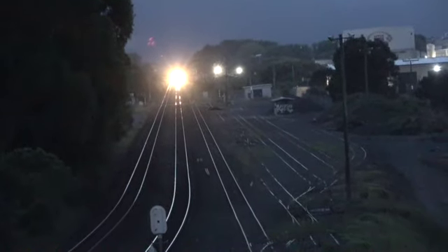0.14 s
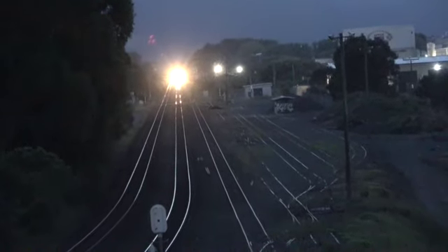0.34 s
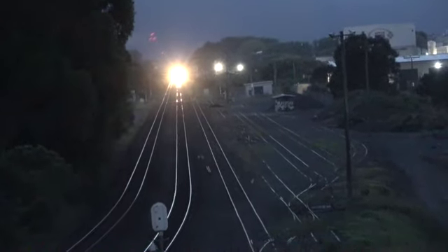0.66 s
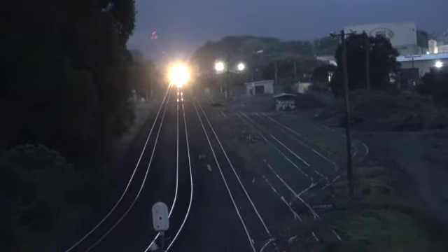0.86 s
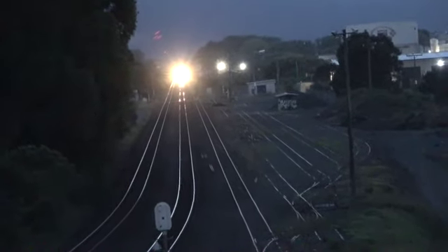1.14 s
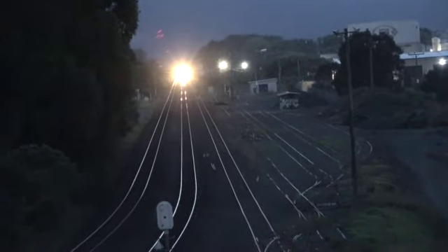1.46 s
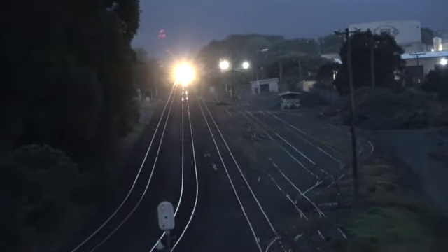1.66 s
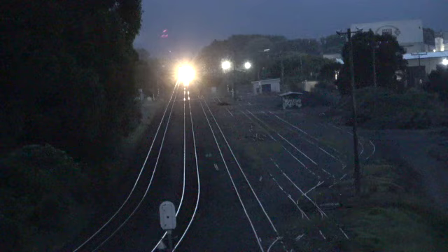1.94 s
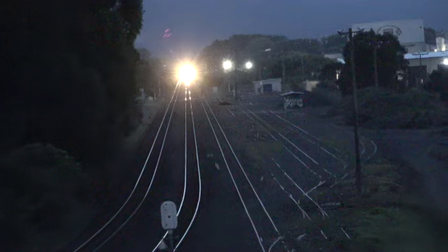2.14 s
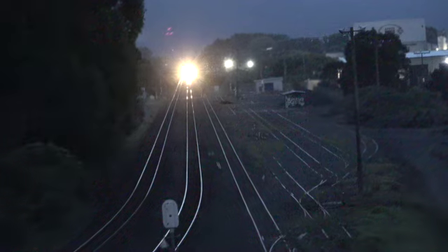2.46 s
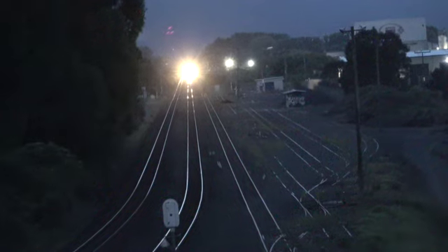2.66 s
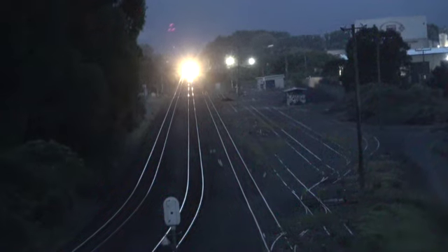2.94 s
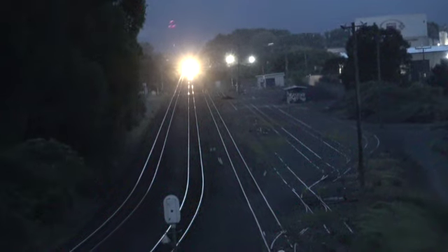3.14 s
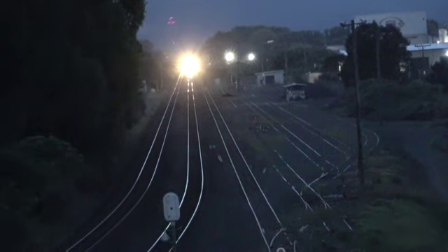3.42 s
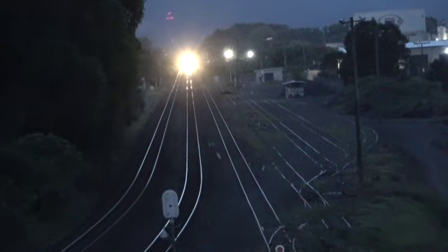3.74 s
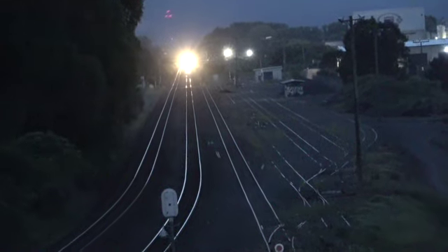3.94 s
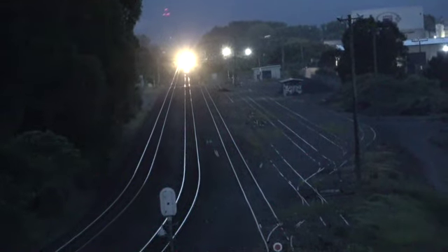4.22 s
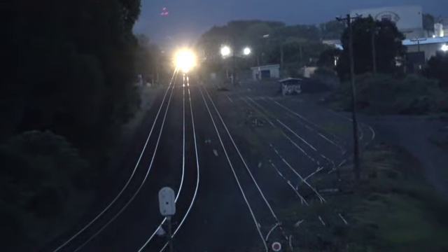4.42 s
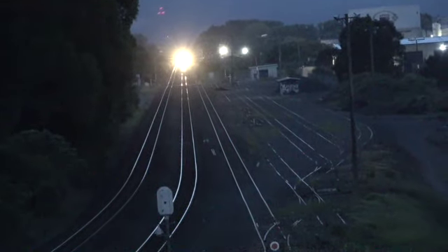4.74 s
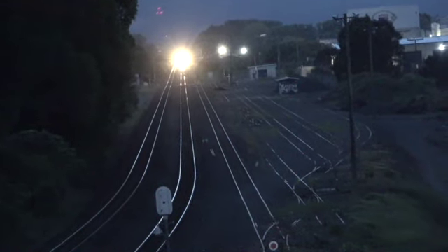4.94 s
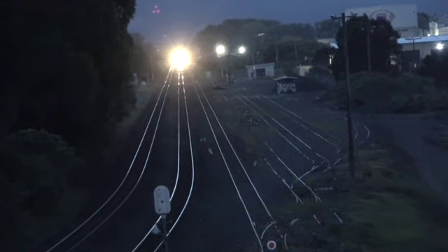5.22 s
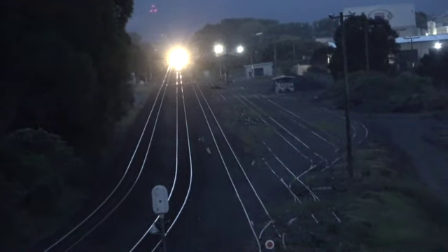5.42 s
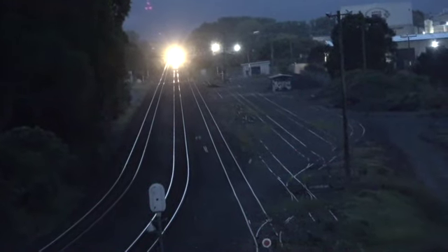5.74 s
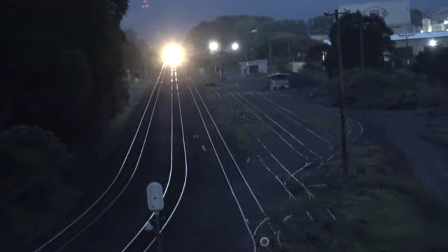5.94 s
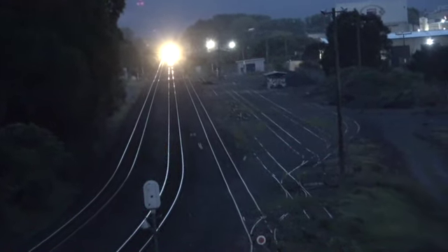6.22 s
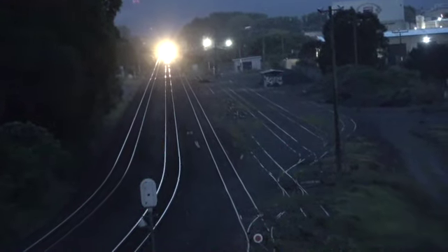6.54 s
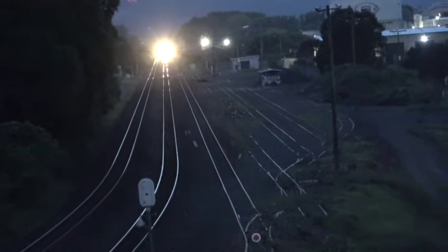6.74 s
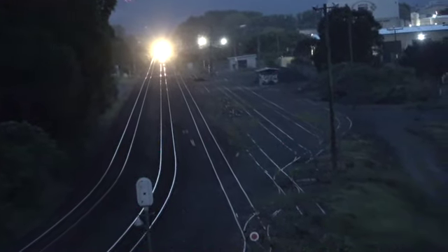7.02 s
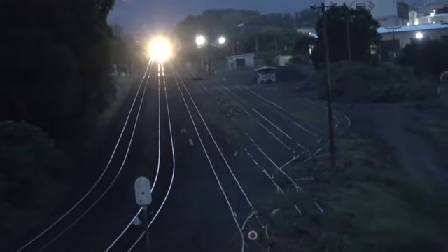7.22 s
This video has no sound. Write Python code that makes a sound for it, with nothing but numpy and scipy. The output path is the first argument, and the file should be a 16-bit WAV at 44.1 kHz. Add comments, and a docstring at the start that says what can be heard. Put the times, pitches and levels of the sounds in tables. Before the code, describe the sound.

Diesel locomotives drone and wind up slowly in the distance at dusk while crickets chirp and trill nearby; engines fade before small close clicks.

```python
"""Dusk beside a railway line: crickets, made of pitch-falling wing strokes, chirp and trill in the grass throughout,
over soft hiss, noise-made wheel roar and drone. One diesel engine hunts, then winds up; from 1.6 s a second one
winds up at its own speed. Their harmonics swell and fade on the way over the ground.
Filtered noise adds a rumble that grows from about 2 s. Rustles and scuffs of grainy noise brush close by;
in the last second the engines die away and small clicks snap and ring near the microphone."""
import sys
import numpy as np
from scipy import signal
from scipy.fft import rfft, irfft, next_fast_len
from scipy.io import wavfile
from scipy.ndimage import uniform_filter1d

SR = 44100
rng = np.random.default_rng(int(sys.argv[2]) if len(sys.argv) > 2 else 0)


def wav_record(signal):
    """Record a signal, one row per channel, as 16-bit PCM in the file named by sys.argv[1]."""
    frames = np.transpose(np.atleast_2d(signal))
    bounded = np.clip(frames, -1, 1)
    # unit amplitude maps onto the largest positive 16-bit level
    quanta = np.round(bounded * 32767).astype(np.int16)
    wavfile.write(sys.argv[1], SR, quanta)


N = 325149
TIME = np.arange(N) / SR


def undb(db):
    """Decibels to gain."""
    return 10 ** (np.asarray(db) / 20)


def unit(x):
    """Scale to rms 1."""
    return x / np.sqrt(np.mean(x ** 2))


def curves(table):
    """The columns of a timed table, sample by sample."""
    s, *columns = np.transpose(table)
    return [np.interp(TIME, s, column) for column in columns]


def colour(x, points):
    """Filter by a spectrum of (frequency [Hz], gain [dB]) points, joined on a log frequency scale."""
    hz, db = np.transpose(points)
    size = next_fast_len(N)
    f = np.maximum(np.arange(size // 2 + 1) * SR / size, 1)
    gain = undb(np.interp(np.log(f), np.log(hz), db))
    return irfft(rfft(x, size) * gain, size)[..., :N]


def noise(points):
    """Noise of rms 1 with the given spectrum."""
    return unit(colour(rng.standard_normal(N), points))


def wide_noise(points):
    """Two-channel noise, nearly alike on both sides except in the treble."""
    # side signal against the middle: (frequency [Hz], level [dB])
    width = [(4600, -29), (5400, -2.5), (9000, -1), (12500, -2), (15000, -11)]
    middle = noise(points)
    side = colour(noise(points), width)
    return middle + np.array([[1], [-1]]) * side


def walk(rate):
    """Smooth random wander of spread near 1, with about `rate` new steps a second."""
    k = max(int(SR / rate), 1)
    steps = rng.standard_normal(2048)[np.arange(N) // k % 2048]
    return 1.3 * uniform_filter1d(uniform_filter1d(steps, k), k)


def swells(table):
    """An envelope of bells (centre [s], peak [dB], length [s]), each 17 dB down one length from its centre."""
    return sum(undb(db) * np.exp(-2 * ((TIME - s) / length) ** 2) for s, db, length in table)


def pan(x, db):
    """Place a sound by its left minus right level, steady or moving."""
    return x * undb(np.array([[1], [-1]]) * db / 2)


def add(track, s, sound):
    """Mix a short sound into a track from time s."""
    i = int(s * SR)
    part = sound[max(-i, 0):max(N - i, 0)]
    track[max(i, 0):max(i, 0) + len(part)] += part


def scatter(x, t60, wet_db, channels):
    """Add a diffuse echo, as from trees and banks, of decaying noise: one for both sides, or one for each."""
    t = TIME[:SR // 2]
    tail = rng.standard_normal((channels, len(t))) * np.exp(-np.log(1000) * t / t60)
    tail /= np.sqrt(np.sum(tail ** 2, axis=1, keepdims=True))
    return x + undb(wet_db) * signal.fftconvolve(x, tail, axes=1)[:, :N]


def syllable(hz, length, sweep):
    """One wing stroke: the scraper slows along the file, so the tone falls ever faster."""
    u = np.arange(int(length * SR)) / (length * SR)
    pitch = hz * (1 + sweep * (1 / 3 - u * (1 + 2 * u) / 3))
    return np.sin(np.pi * u) * np.sin(2 * np.pi * np.cumsum(pitch) / SR)


def trill(start, end, hz, rate, length, sweep):
    """A run of slightly uneven wing strokes that fades in and out."""
    fade_s = .05  # the fades reach this far to either side of the start and the end
    voice = np.zeros(N)
    times = np.arange(start - fade_s, end + fade_s, 1 / rate)
    for s, (late, detune, size) in zip(times, rng.standard_normal((512, 3))):
        fade = np.sqrt(np.clip(.5 + .5 * min(s - start, end - s) / fade_s, 0, 1))
        stroke = syllable(hz * (1 + 0.0097 * detune), length, sweep)
        add(voice, s + .07 * late / rate, fade * stroke * undb(0.88 * size))
    return voice


def air():
    """Soft steady hiss: filtered noise, spread wide in the treble."""
    # spectrum of the hiss: (frequency [Hz], relative level [dB])
    air_colour = [(1000, 9), (4800, 4), (6200, 8.5), (8500, 3), (12500, 1), (16000, -4)]
    return wide_noise(air_colour) * undb(-66.5)


def shrill_insects():
    """Smaller insects to the right, with fast high wing strokes: one trills in bouts, a few faint ones never stop."""
    # bouts of the nearer insect: (start [s], end [s], pitch [Hz], relative level [dB])
    bout_table = [(0, .34, 6950, -63.5), (0.338, .88, 7200, -69), (1.28, 2.16, 7060, -68.5),
                  (2.162, 2.58, 6900, -64), (3.146, 4.1, 7070, -69), (4.453, 5.5, 7060, -65.5),
                  (5.498, 6.1, 7210, -69), (6.601, 7.37, 7060, -63.5)]
    bouts = sum(trill(start, end, hz, rate=61.4, length=.018, sweep=0.074) * undb(db + 3)
                for start, end, hz, db in bout_table)
    voices = [(6180, 38), (6500, 27), (7300, 60)]  # (pitch [Hz], rate [strokes/s])
    faint = sum(trill(0, N / SR, hz, rate, length=0.017, sweep=0.09) * undb(-70.0 + 1.6 * walk(3.0))
                for hz, rate in voices)
    left, right = pan(bouts * undb(1.3 * walk(9)), -4) + pan(faint, -1.5)
    left = np.roll(left, 1)  # reaches the left a moment later
    return scatter(np.array([left, right]), t60=0.14, wet_db=-3, channels=2)


def far_crickets():
    """A chorus of steady trills further off, blurred by the undergrowth into a diffuse tail."""
    # swell of the chorus: (time [s], relative level [dB])
    chorus_curve = [(0, -60), (1.3, -55.5), (2, -56), (2.6, -58.5), (3.25, -60.5), (4.3, -54), (5.5, -60.5),
                    (6.4, -56.5), (7.37, -58.5)]
    chorus_db, = curves(chorus_curve)
    # (pitch [Hz], rate [strokes/s])
    voices = [(3680, 27), (3740, 30), (3790, 32), (3840, 17.5), (3880, 27), (3930, 34)]
    chorus = unit(sum(trill(0, N / SR, hz, rate, length=0.02525, sweep=.14) * undb(1.96 * walk(2.93))
                      for hz, rate in voices))
    return scatter(pan(chorus * undb(chorus_db - .5), 4.5), t60=.2, wet_db=-15, channels=1)


def near_crickets():
    """Two crickets scrape phrases of slow chirps and quick trills, no two strokes quite alike."""
    # (first stroke [s], last stroke [s], relative level [dB], cricket, song)
    phrases = [ (0.011, 0.067, -5, "low", "chirp"), (0.197, 0.743, -5, "low", "trill"),
               (.722, 0.937, -5.5, "high", "chirp"), (0.98, 1.023, -7, "high", "trill"),
               (1.233, 1.336, -4, "low", "trill"), (1.551, 1.786, -1, "low", "chirp"),
               (1.844, 2.234, -3, "low", "trill"), (2.279, 2.981, -12.5, "low", "trill"),
               (3.017, 3.119, -5, "low", "trill"), (3.423, 3.659, -4.5, "low", "chirp"),
               (3.712, 3.777, -3.5, "low", "trill"), (3.525, 3.903, -7.5, "high", "chirp"),
               (4.072, 4.45, -10, "high", "trill"), (4.62, 4.855, -10, "high", "trill"),
               (4.965, 5.291, -10.5, "low", "trill"), (5.546, 5.825, -6.5, "high", "chirp"),
               (5.863, 6.07, -7.5, "high", "trill"), (6.233, 6.462, -6.5, "high", "trill"),
               (6.575, 6.77, -2.5, "low", "chirp"), (6.85, 7.322, -10.5, "low", "trill")]
    # each cricket: (pitch [Hz], left minus right [dB])
    singers = {"low": (3775, 7.3), "high": (4030, 4.4)}
    # each song: (rate [strokes/s], stroke length [s], fall of pitch in a stroke [share])
    songs = {"chirp": (17.3, .032, 0.177), "trill": (30.4, .028, 0.138)}
    # spread from stroke to stroke: (length [share], level [dB], pitch [share], fall [share])
    uneven = (.08, 1.5, .006, .14)
    out = np.zeros((2, N))
    for first, last, db, cricket, song in phrases:
        hz, pan_db = singers[cricket]
        rate, stroke_s, sweep = songs[song]
        voice = np.zeros(N)
        times = np.linspace(first, last, round((last - first) * rate) + 1)
        variations = rng.standard_normal(size=(40, 4)) * uneven
        for s, (stretch, force_db, detune, bend) in zip(times, variations):
            length = stroke_s * (1 + stretch)
            stroke = syllable(hz * (1 + detune), length, sweep * (1 + bend))
            add(voice, s - length / 2, undb(db + force_db) * stroke)
        out += pan(voice, pan_db)
    # the wings resonate only up to a little over 4 kHz
    resonance = [(3000, -6.5), (3450, 2), (4150, -1.5), (4400, -11)]
    return colour(out, resonance) * undb(-42.5)


def whistle():
    """One faint, falling tone of wavering level, perhaps a bird."""
    out = np.zeros(N)
    add(out, 3.64, syllable(2950, length=.2, sweep=.14))
    return pan(out * undb(-60.5 + 3.8 * walk(40)), -2.6)


def brush(table, points, grain_db):
    """Friction: short swells of noise whose level flickers in fine grains."""
    grain = unit(undb(grain_db * walk(900)))
    return swells(table) * grain * wide_noise(points)


def rustles():
    """Thin rustles in the grass: grainy friction noise, all treble."""
    # (centre [s], peak level [dB], length [s])
    rustle_table = [(.455, -62, 0.024), (.99, -59, 0.025), (1.84, -67, 0.021), (3.425, -59.5, 0.015),
                    (3.54, -67, 0.013), (4.03, -68, 0.019), (6.17, -67, 0.014), (6.27, -65, .02),
                    (6.41, -57, 0.021), (6.83, -68, 0.036)]
    spectrum = [(5000, -33), (8000, -10), (9500, -1), (11500, 1), (13500, -10), (16000, -18)]
    return pan(brush(rustle_table, spectrum, grain_db=3), -1)


def scuffs():
    """Dry scuffs to the right: coarser friction noise, strongest in the middle range."""
    # (centre [s], peak level [dB], length [s])
    scuff_table = [(.15, -63, 0.039), (.745, -56, 0.039), (.997, -54, 0.023), (6.5, -41.5, 0.032),
                   (6.56, -47.5, 0.034), (6.655, -52.5, 0.018), (6.745, -52, 0.016)]
    spectrum = [(150, -10), (650, 27.5), (1500, 8), (2800, 9), (5000, 6), (7000, 6.5), (12000, -0.5),
                (16000, -10)]
    return pan(brush(scuff_table, spectrum, grain_db=5.5), -8.5)


def clicks():
    """Each click is a tiny noise snap and a quickly damped ring of two modes."""
    # (time [s], relative level [dB], ring [Hz], snap against the ring [dB], left minus right [dB])
    click_table = [(6.489, -31, 860, -3, -10), (6.507, -29, 7050, -5, -10), (6.541, -45, 2370, 5, -4),
                   (6.555, -37, 6000, -7, -12), (7.183, -20.5, 1030, -30, -7),
                   (7.2253, -23.5, 2660, 0.5, -6), (7.281, -19.5, 933, -5, -4)]
    # what a click rings with: (multiple of its ring frequency, level [dB])
    modes = [(1, -5.5), (2.08, -18.5)]
    ring_s, snap_s = 0.0014, 0.00038  # ring falls to 1/e in this time; snap peaks at this time
    snap_colour = [(300, 4), (1800, 1), (4500, -0.5), (8000, -9.5), (12000, -7.5), (15500, -22)]
    out, t = np.zeros((2, N)), TIME[:SR // 50]
    for s, db, hz, snap_db, pan_db in click_table:
        ring, snap = np.zeros(N), np.zeros(N)
        tone = sum(undb(mode_db) * np.sin(2 * np.pi * k * hz * t) for k, mode_db in modes)
        burst = rng.standard_normal(len(t)) * t / snap_s * np.exp(1 - t / snap_s)
        add(ring, s, tone * np.exp(-t / ring_s))
        add(snap, s, undb(snap_db) * burst)
        out += pan(undb(db) * (ring + colour(snap, snap_colour)), pan_db)
    return scatter(out, t60=.02, wet_db=-12, channels=2)


def wheels():
    """Rolling wheels: a broad roar of filtered noise, a little louder midway."""
    # spectrum: (frequency [Hz], relative level [dB])
    wheel_colour = [(40, -45), (200, 3), (450, 1.5), (620, 5), (760, 0.5), (1020, 3.5), (1200, -3),
                    (1580, -4), (1900, -10), (2350, -14.5), (2700, -17), (3200, -18.5), (5000, -35)]
    level = undb(-50.5 + .5 * walk(10.0)) + swells([(3.46, -62, 3.9)])
    return noise(wheel_colour) * level


def singing_wheels():
    """The wheels ring for a moment: a narrow band of noise near 1 kHz."""
    spectrum = [(700, -6), (920, 0), (1030, 10), (1130, -8), (1400, -51)]
    return noise(spectrum) * swells([(3.15, -49.5, 0.51)])


def low_roar():
    """Soft unsteady swells of noise centred near 310 Hz."""
    # (centre [s], relative peak level [dB], length [s])
    roar_swells = [(.4, -41, 0.2), (1.3, -45.5, 0.19), (7.15, -51.5, 0.14)]
    spectrum = [(100, -25), (200, -30), (310, 4.5), (480, -5.5), (620, -12.5), (1000, -19.0), (2000, -53.0)]
    return noise(spectrum) * swells(roar_swells) * undb(2 * walk(16))


def drone():
    """Droning bodywork: a low-mid band of noise with a wandering level."""
    # spectrum: (frequency [Hz], relative level [dB])
    drone_colour = [(30, -62), (60, -26.5), (100, -3.5), (160, 4.5), (220, 5), (330, 2), (420, -2.5),
                    (560, -14.5), (900, -51)]
    # (time [s], level before the wander [dB])
    drone_curve = [(0, -44.5), (.6, -43.5), (1.7, -47.5), (2.6, -42.5), (4.1, -42.5), (4.8, -46.5),
                   (6.5, -43.5), (7.37, -43.5)]
    drone_db, = curves(drone_curve)
    return noise(drone_colour) * undb(drone_db + 1.6 * walk(9))


def rumble():
    """Turbulent exhaust rumble: bass noise that comes on with the throttle and dies as it closes."""
    # spectrum: (frequency [Hz], relative level [dB])
    rumble_colour = [(12, -5), (26, -6), (45, 0.5), (70, -1), (110, 2), (180, -2), (300, -16), (600, -72.5)]
    # (time [s], relative level [dB])
    rumble_curve = [(0.0, -69.5), (1.87, -74), (1.95, -52.5), (2.34, -61), (3.06, -45), (6.22, -38.5),
                    (6.3, -46.5), (6.81, -45), (7.37, -67)]
    rumble_db, = curves(rumble_curve)
    return noise(rumble_colour) * undb(rumble_db + 6.5 + 0.93 * walk(8))


def exhaust(engine, harmonics, waver, fade_db):
    """Harmonics of an unevenly turning engine climb through the path's peaks and flutter in the moving air."""
    # peaks and dips of the exhaust stack and the path over the ground: (frequency [Hz], gain [dB])
    path = [(60, -45), (88, -16.5), (115, -5.5), (140, -0.5), (218, -1.5), (240, -5), (285, -13.5),
            (325, -10), (355, -18.5), (380, -11), (420, -27.5), (495, -13), (560, -18), (620, -19.5),
            (800, -24.5)]
    hz, db, rasp_db = curves(engine)
    path_hz, path_db = np.transpose(path)
    phase = 2 * np.pi * np.cumsum(hz * (1 + waver * walk(22))) / SR
    out = np.zeros(N)
    for multiple, own_db in harmonics:
        k = round(multiple)
        path_gain_db = np.interp(np.log(k * hz), np.log(path_hz), path_db)
        overtone_db = (k > 1) * rasp_db
        flutter_db = fade_db * k ** 0.57 * walk(12)  # deeper on higher harmonics
        level_db = db + own_db + overtone_db + path_gain_db + flutter_db
        out += np.sqrt(2) * undb(level_db) * np.sin(k * phase + rng.uniform(0, 2 * np.pi))
    return out


def engines():
    """Two exhaust notes, each a stack of harmonics following its own engine speed."""
    # winds up from 1.6 s: (time [s], exhaust note [Hz], relative level [dB], rasp: extra on the overtones [dB])
    lead = [(1.6, 81, -50, -2), (2.0, 86.65, -37.5, 2), (2.55, 97.5, -35, 0), (3.3, 110.4, -32, 4),
            (3.75, 117.7, -34.5, -5.5), (4.3, 126.8, -34, 7), (4.6, 130.7, -30, -1),
            (5.15, 138.8, -21.5, -6), (5.75, 151.7, -28, -3), (6.15, 159.1, -26.5, -6.5),
            (6.5, 165.1, -30, 4), (6.7, 164, -43.5, -14), (7.37, 159, -64, 19)]
    # hunts at first and then winds up; same columns
    second = [(0, 63, -45, 1), (.5, 69.5, -37.5, 3), (1.0, 59.5, -36.5, -3.5), (1.45, 65.9, -36, 0),
              (1.9, 68.7, -38, -1.5), (2.35, 71.2, -24.5, 2.5), (3.1, 82.7, -21, -4),
              (3.95, 95.5, -23.5, 7), (4.55, 99.4, -23.5, -8.5), (4.95, 104.3, -24, -2),
              (5.75, 117.3, -28.5, 1), (6.15, 125.8, -25, -1.5), (6.35, 129.8, -44, 16),
              (6.7, 138.1, -39, -3), (7.0, 138.6, -51, 0)]
    # make-up of each exhaust note: (multiple, level [dB])
    lead_harmonics = [(1, -1.5), (2, -8), (3, -7), (4, -11.5), (5, -15.5)]
    second_harmonics = [(1, 0), (2, -18.5), (3, -25.5), (4, -14.5), (6, -27.5)]
    lead_note = exhaust(lead, lead_harmonics, waver=0.005956, fade_db=1.5)
    second_note = exhaust(second, second_harmonics, waver=0.00906, fade_db=1.8)
    return lead_note + second_note


def train():
    """Engines, rumble, bodywork and wheels share one moving bearing; the deep bass stays a little to the left."""
    # where the train sits between the ears: (time [s], left minus right [dB])
    bearing = [(0.0, -2.5), (3.9, -7.5), (4.1, -9), (5.32, -5), (6.61, -7.5), (7.37, -4)]
    # share of the sound that counts as deep bass: (frequency [Hz], gain [dB])
    bass_share = [(95, -1.5), (135, -4.5), (190, -27.5), (400, -64)]
    sound = engines() + rumble() + drone() + wheels() + low_roar() + singing_wheels()
    bass = colour(sound, bass_share)
    bearing_db, = curves(bearing)
    return pan(bass, 5) + pan(sound - bass, bearing_db)


def scene():
    """Soft hiss, the insects, small close noises and the train."""
    crickets = scatter(far_crickets() + near_crickets() + whistle(), t60=0.081, wet_db=-10.5, channels=1)
    close = rustles() + scuffs() + clicks()
    return air() + shrill_insects() + crickets + close + train()


def record(dry):
    """The recorder cuts the top: a steep elliptic low-pass at 15.8 kHz."""
    low_pass = signal.ellip(10, .2, 70, 15800, fs=SR, output="sos")
    return signal.sosfilt(low_pass, dry)


dry = scene()
out = record(dry)
wav_record(out)
```